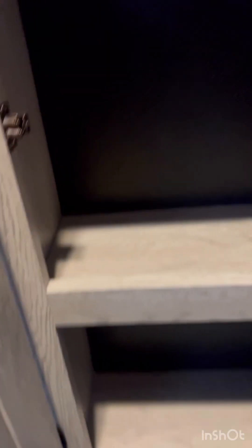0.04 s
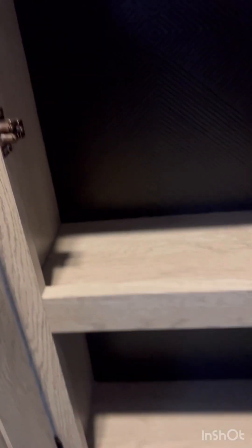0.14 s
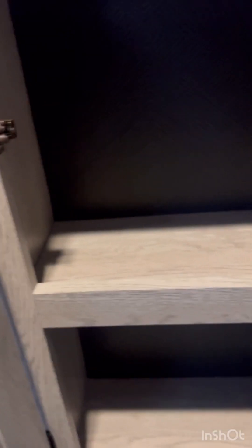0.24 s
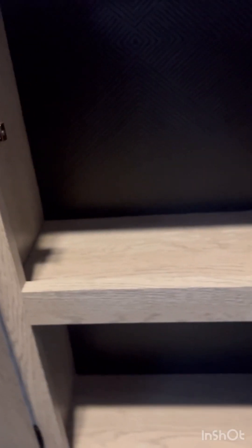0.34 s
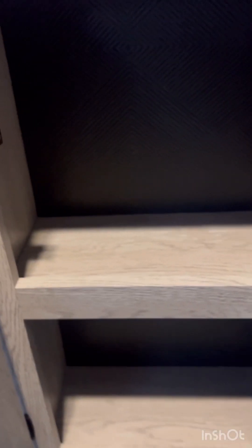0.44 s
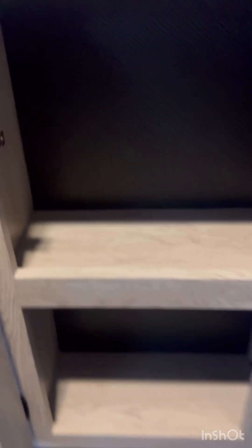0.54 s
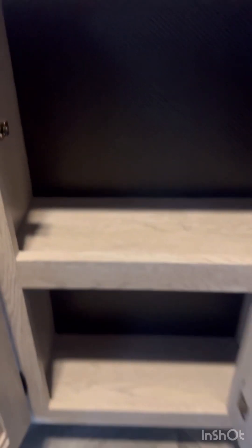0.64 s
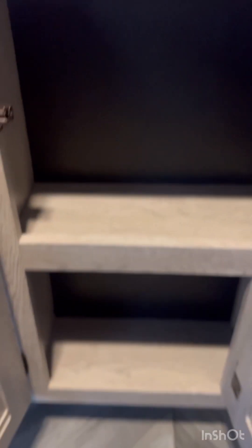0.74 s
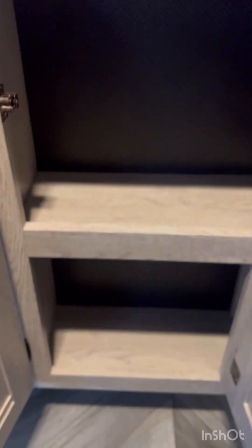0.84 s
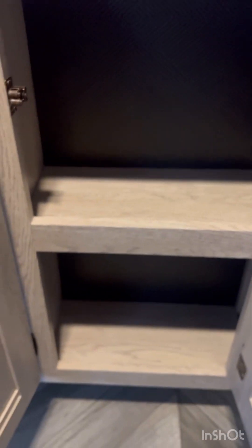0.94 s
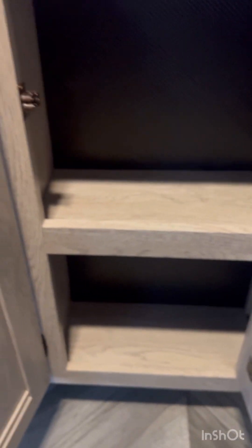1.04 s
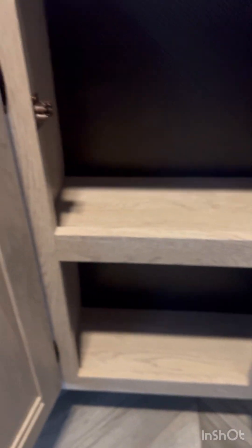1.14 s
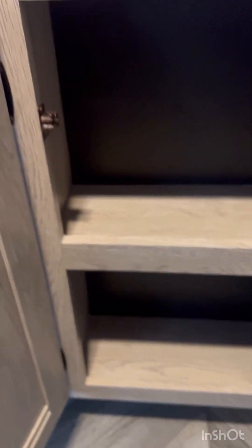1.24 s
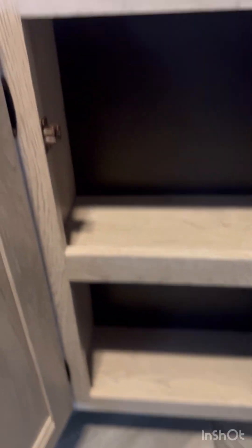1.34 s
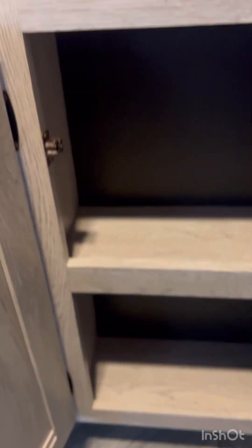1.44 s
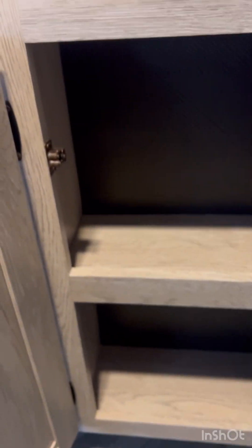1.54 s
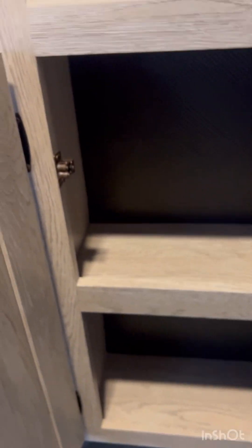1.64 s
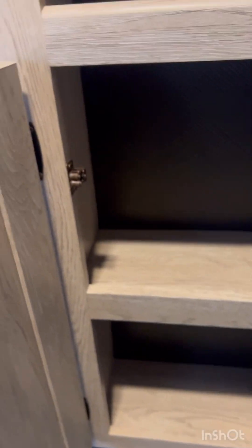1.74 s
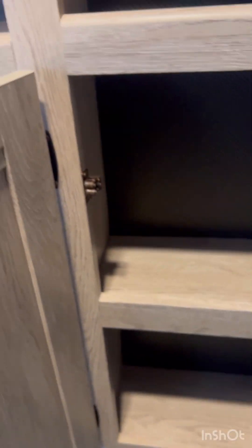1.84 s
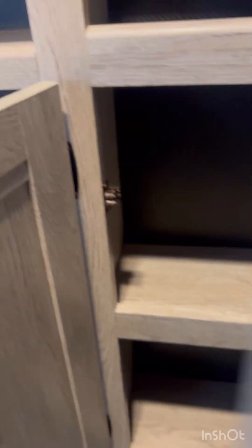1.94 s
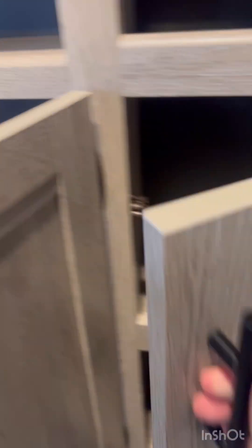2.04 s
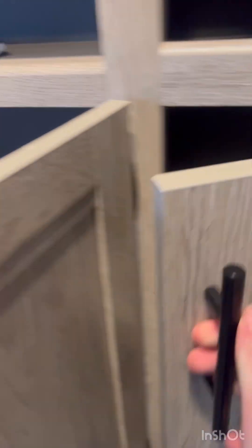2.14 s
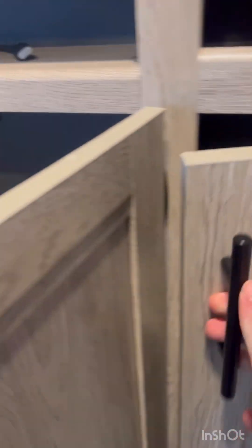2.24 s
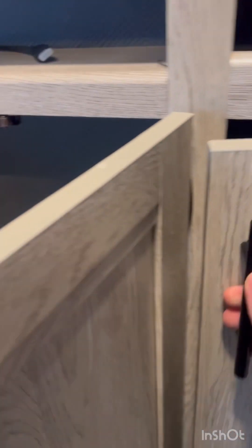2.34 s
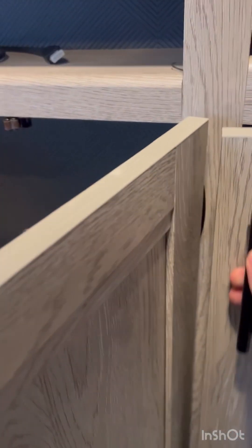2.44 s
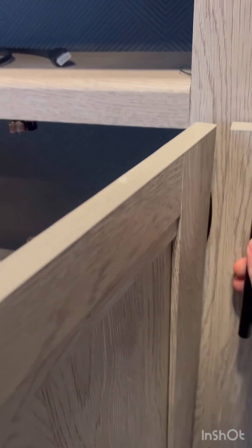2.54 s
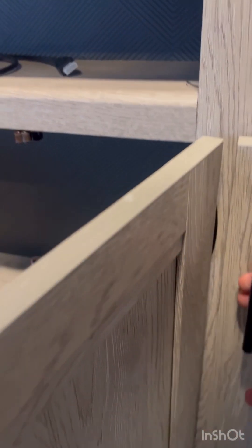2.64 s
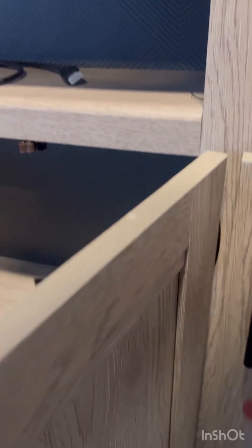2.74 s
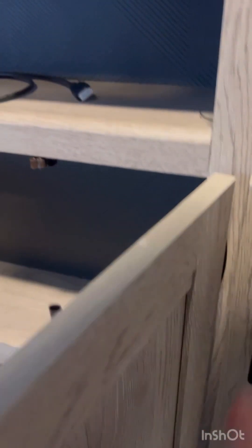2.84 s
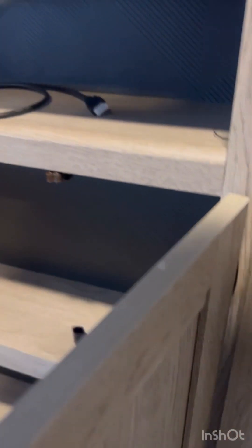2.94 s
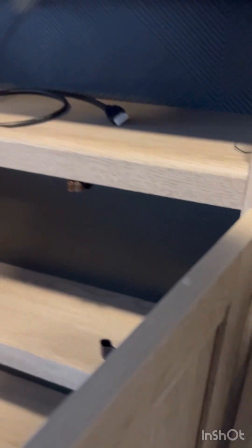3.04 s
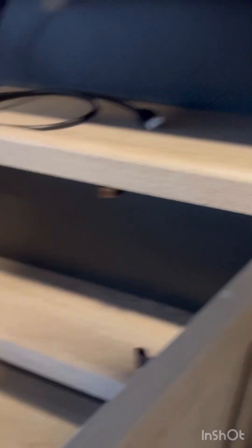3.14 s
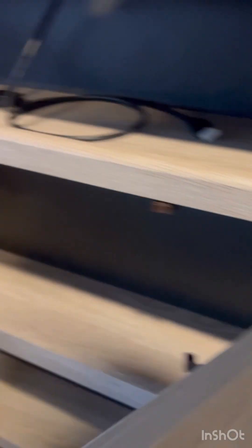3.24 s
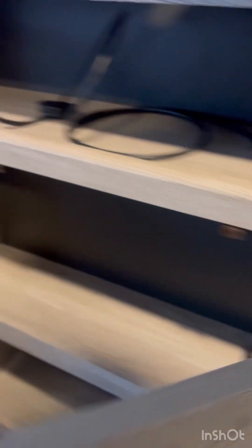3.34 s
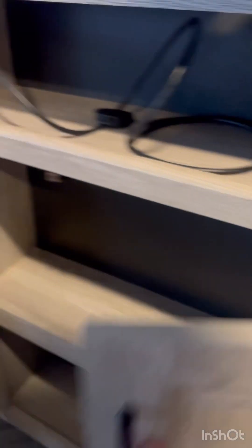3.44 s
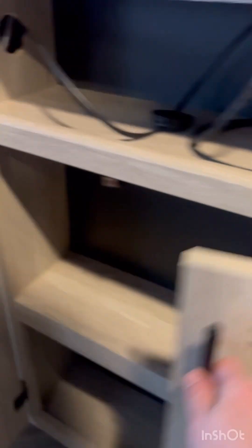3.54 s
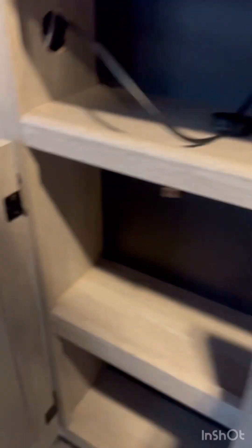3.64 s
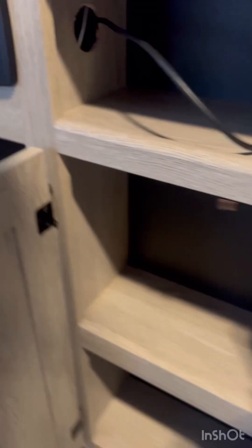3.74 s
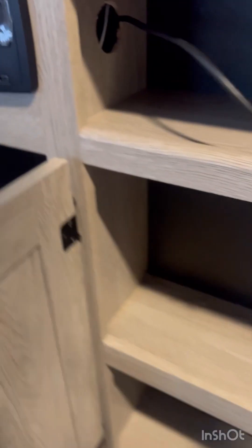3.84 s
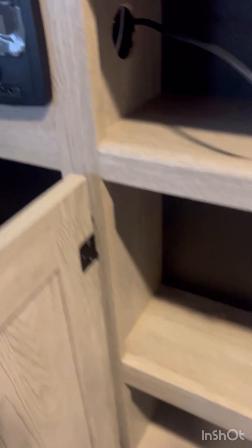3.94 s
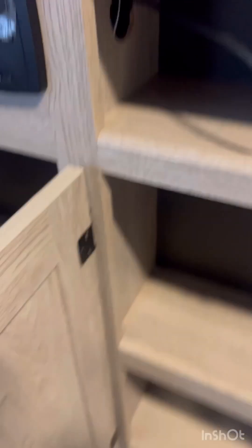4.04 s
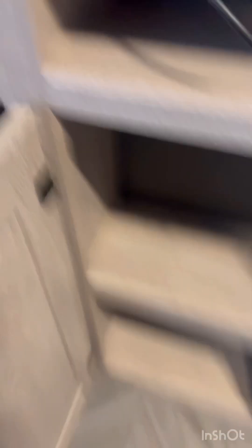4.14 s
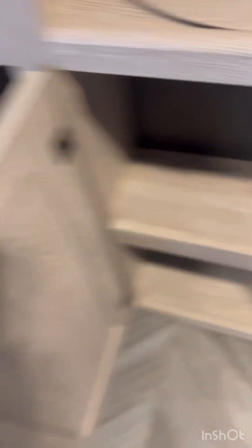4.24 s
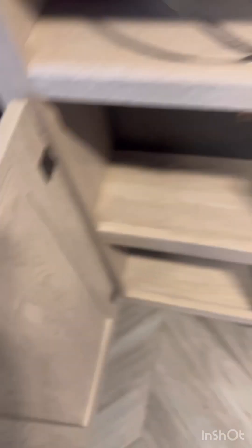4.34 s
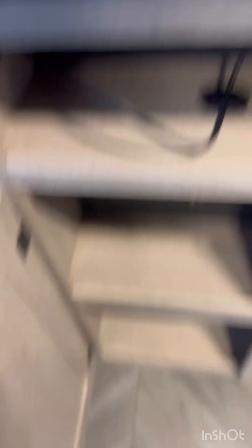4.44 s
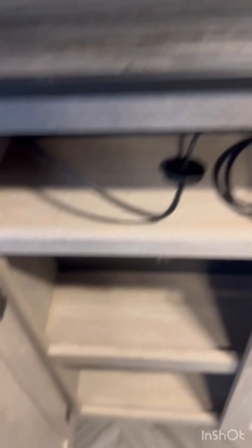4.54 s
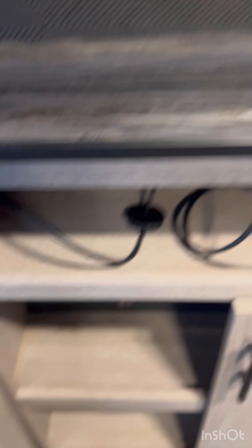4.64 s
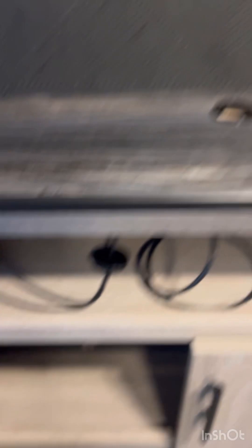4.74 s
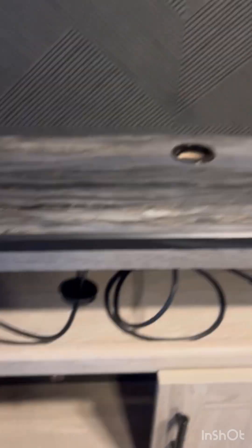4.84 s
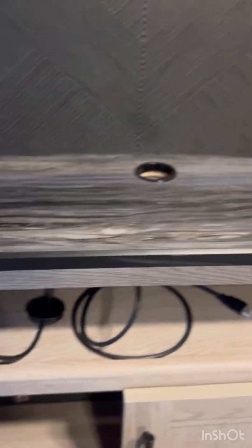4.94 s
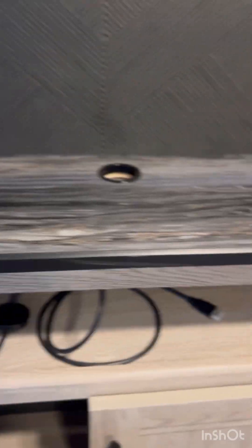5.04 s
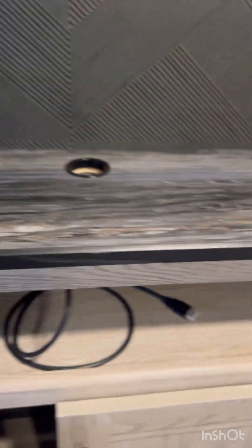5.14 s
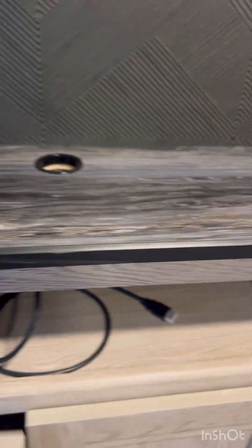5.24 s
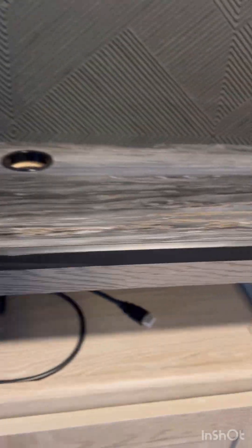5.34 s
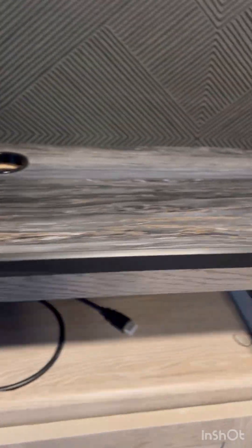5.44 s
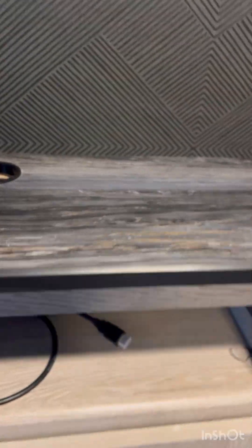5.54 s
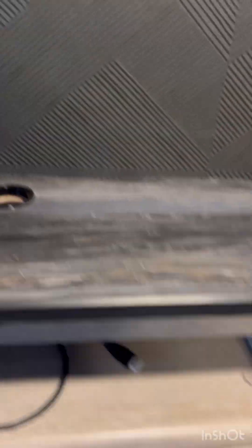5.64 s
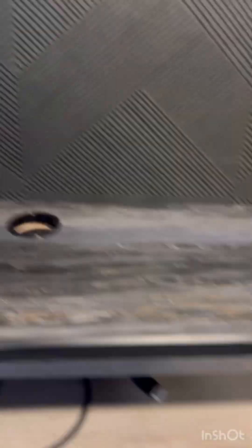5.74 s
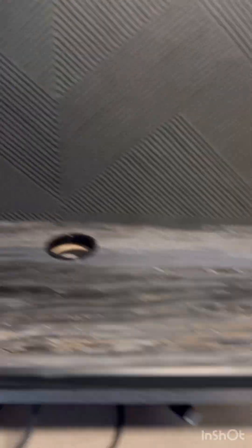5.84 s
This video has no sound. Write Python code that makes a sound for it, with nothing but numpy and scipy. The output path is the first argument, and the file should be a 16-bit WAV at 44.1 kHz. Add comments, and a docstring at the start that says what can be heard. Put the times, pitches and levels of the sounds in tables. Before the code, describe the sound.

Three wooden cabinet doors are pushed shut one after another, each with a bright catch snap, heavy slam and quick bounces in a quiet small camper.

```python
"""Cabinet doors pushed shut in a small camper

Three wooden doors, heard from close by: filtered-noise snaps at the catch, then slams and bounces
made of clicks, noise knocks and decaying panel modes. Between them come dull steps and bumps that hum
in the furniture, dry low-passed taps with short rattles, and cloth rustle of enveloped noise.
Steady coloured noise is the quiet air of the camper.
"""
import sys
import numpy as np
from scipy import signal
from scipy.fft import rfft, irfft, next_fast_len
from scipy.io import wavfile
from scipy.ndimage import uniform_filter1d, minimum_filter1d

SR = 44100
rng = np.random.default_rng(int(sys.argv[2]) if len(sys.argv) > 2 else 0)


def waveform_to_disk(signal):
    """Save audio, clipped to [-1, 1], as 16-bit WAV at the path in sys.argv[1]."""
    frames = np.transpose(np.atleast_2d(signal))
    scaled = np.clip(frames, -1, 1) * 32767
    samples = np.round(scaled).astype(np.int16)
    wavfile.write(sys.argv[1], SR, samples)


N = 260190

# Space and materials
BANDS_HZ = np.geomspace(35, 16000, 22)
RING_SAMPLES = 28000
# wood decay before each source's factor: f/Hz, t60/s
WOOD_DECAY = [(50, 0.36), (150, 0.55), (400, 0.2), (1200, 0.17), (3000, 0.12), (10000, 0.04)]
# room decay: f/Hz, t60/s
ROOM_DECAY = [(50, 1), (150, 0.54), (400, 0.37), (1200, 0.38), (3000, 0.54), (8000, 0.32), (15000, 0.12)]
# stereo width: f/Hz, side over mid/dB
STEREO_WIDTH = [(50, -47), (125, -32), (250, -19.5), (500, -9), (1000, -4), (2000, -11.5), (4000, -5.5),
                (10000, -3.5)]
# nominal early reflections off the door and shelves: delay/s, gain
EARLY_ECHOES = [(0, 0.48), (.0013, -0.26), (.0026, .5), (.0047, -0.12)]

# air of the camper, relative spectrum: f/Hz, density/dB per Hz
AIR_SPECTRUM = [(15, -36), (25, -4.5), (72, 1.5), (166, -10.5), (223, -14.5), (545, -21), (607, -19.5),
                (734, -26), (1130, -28.5), (2110, -27.5), (2610, -33.5), (5280, -44.5), (8590, -49.5),
                (16000, -79)]
AIR_DB = -51.5

# cloth, relative spectrum: f/Hz, density/dB per Hz
CLOTH_SPECTRUM = [(150, 2.5), (400, 6.5), (900, 0), (2000, -3.5), (3500, -2), (6000, -2), (8500, -0.5),
                  (10000, -3), (11500, -22.5), (13000, -23), (15500, -17)]
# body movements that rustle the clothes: t/s, swell/s, length/s, level/dB
BODY_MOVES = [(0, 0.034, 0.069, -61.5), (.33, 0.21, 0.45, -65.5), (1.02, 0.042, 0.3, -66),
              (1.54, 0.11, 0.24, -63.5), (1.85, 0.18, 0.73, -64.5), (2.17, 0.065, .12, -58.5),
              (2.85, 0.17, 0.16, -51), (3.11, 0.02, 0.036, -54), (3.22, .12, 0.16, -47.5),
              (3.44, 0.017, .12, -54.5), (4.04, 0.045, .11, -44.5), (4.2, 0.055, 0.046, -52.5),
              (4.40, 0.086, 0.13, -55), (4.87, 0.16, 0.4, -50.5), (5.65, 0.059, 0.11, -51)]
MOVE_FADE_DB_PER_S = 127
WALK_START_S, WALK_SWELL_S, WALK_DB = 2.3, .15, -59.5  # walking on keeps up a faint rustle
# sleeve on a panel, relative spectrum: f/Hz, density/dB per Hz
BRUSH_SPECTRUM = [(1200, -15), (2400, -7), (3200, -0.5), (4300, -3.5), (5500, -11.5), (9000, -11),
                  (12000, -30)]
BRUSH_S, BRUSH_DB, BRUSH_RISE_DB_PER_S, BRUSH_FADE_DB_PER_S = 5.105, -38.5, 330, 260

# steps and soft bumps on the furniture: t/s, level/dB, centre f/Hz
SOFT_BUMPS = [ (.312, -51.5, 251), (.354, -47.5, 315), (.714, -53.5, 186), (1.072, -55, 400),
              (1.336, -45, 390), (1.420, -43, 313), (1.541, -42, 295), (1.595, -45, 159), (1.735, -53, 202),
              (2.716, -45, 463), (2.744, -36, 80), (2.995, -38.5, 230), (3.008, -36.5, 146),
              (3.157, -38.5, 334), (3.175, -35, 125), (4.508, -37.5, 289), (4.719, -50, 101)]
BUMP_OCTAVES, BUMP_T60_FACTOR = 0.78, 1.0
# light ticks of loose fittings: t/s, level/dB, centre f/Hz
FITTING_TICKS = [(.312, -69.5, 2850), (1.546, -57.5, 1690), (2.826, -59, 1450), (2.886, -57.5, 1087),
                 (3.558, -52, 1760), (3.588, -50.5, 1020), (4.031, -56.5, 1180), (4.5, -51.5, 1710),
                 (4.704, -55.5, 1554)]
TICK_OCTAVES, TICK_T60_FACTOR = 0.22, 0.72
# built-in furniture modes, rung by bumps and ticks: f/Hz, relative level/dB, t60/s
FURNITURE_MODES = [(147.6, 9, 0.34), (167.5, 1.5, 0.13), (213.4, 5.5, 0.42), (290.8, -4, 0.33),
                   (458.4, -2, 0.26), (564, -14, 0.16), (677, -15, 0.14), (1085, 2, 0.11), (1660, 3, 0.21)]
# heavy footfalls on the hollow floor: t/s, level/dB
FLOOR_STEPS = [(4.52, -23), (4.7208, -38)]
# hollow floor modes: f/Hz, relative level/dB, t60/s
FLOOR_MODES = [(80.75, 5, 0.56), (84, -21, 0.21), (119, -8.5, 0.51), (152.6, -10.5, 0.49),
               (224.5, -10.5, 0.4)]

# dry close taps: t/s, relative level/dB, centre f/Hz, width/octaves, direct crack/dB
DRY_TAPS = [(4.108, -31, 1980, 0.12, -4), (4.118, -23, 102.5, 0.19, -10), (4.245, -28, 235, 1.3, -9),
            (4.2559, -30.5, 930, 0.62, 13)]
# chatter runs: t/s, length/s, relative level/dB
RATTLE_RUNS = [(4.109, .056, -37.5), (4.207, .016, -39.5), (4.2612, .019, -33.5)]
RATTLE_GAP_S, RATTLE_JITTER_S, RATTLE_SPREAD_DB = .0072, 0.00065, 1
RATTLE_HZ, RATTLE_OCTAVES, RATTLE_CRACK_DB = 870, 1, -15
TAP_TRIM_DB = -6  # on taps and rattles alike

# A catch snaps twice, as the strike meets its rollers and as it drops in behind them, with a jolt each:
# t/s, door, snap level/dB, spring f/Hz, spring boost/dB, jolt delay/s, jolt level/dB
CATCH_SNAPS = [ (2.486, "first", -30.5, 4100, 7, 0.0041, -18.5),
               (2.537, "first", -37, 8500, 6, 0.000092, -10.5),
               (3.639, "second", -34, 5650, 11, 0.0052, -8), (3.689, "second", -29.5, 7250, 9, 0.00455, -5),
               (5.267, "third", -32.5, 3780, 3.5, 0.00197, -13.5),
               (5.308, "third", -33, 7770, 11.5, 0.000078, -12.5)]
# snap, relative spectrum: f/Hz, density/dB per Hz
SNAP_SPECTRUM = [(200, -20), (800, -7), (2000, 5.5), (3000, 0), (4200, -0.5), (6000, -6), (10000, -3.5),
                 (12500, -27), (15500, -12)]
ROLLER_GAP_S, SECOND_ROLLER_DB, SNAP_CRACK_DB = .004, -4.5, -1  # the two rollers never give way together
JOLT_HZ, JOLT_KNOCK_DB, JOLT_CRACK_DB = 730, -12.5, -1.5  # the sprung catch is a soft contact

# modes of each door with its cabinet: f/Hz, relative level/dB, t60/s
DOOR_MODES = { "first": [(52.05, -5, 1), (63.6, -5, 0.21), (82.9, -18, 0.98), (109, -36, 0.22),
              (151.3, -9, 0.35), (197, -13.5, 0.28), (217, -13, 0.27), (265, -14, 0.23),
              (291.2, -5.5, 0.31), (328, -20, 0.35), (384, -22, 0.25), (501, -11.5, 0.18), (570, -24, 0.25),
              (628, -19, 0.25), (950, -14, 0.14), (1054, -4, 0.078), (1164, -11, 0.11), (1550, -38, .18),
              (2020, -22, .16), (2127, -18.5, 0.17), (2850, -48, .22)], "second": [(51, -23, .7),
              (65.25, -28.5, 1), (99.4, -26, 0.57), (152.3, -14.5, 0.44), (182, -10, 0.16),
              (196, -20, 0.35), (212.4, -11.5, 0.31), (260, -12, 0.13), (309, -16, 0.32),
              (338.6, -0.5, 0.064), (465, -17, 0.22), (548, -8, 0.13), (588, -5, 0.11), (640, -40, .2),
              (726, -16, 0.26), (973, -26, 0.16), (1127, -12, 0.17), (1260, -23, 0.25), (1670, -18, .2),
              (1656, -25, 0.15), (1800, -13.5, 0.15), (2208, -10, 0.14), (2282, -28, 0.17), (2550, -40, .2),
              (2868, -17, 0.079), (3920, -13, 0.14)], "third": [(49.2, -22, 0.81), (75, -27, 0.44),
              (92.2, -11.5, 0.36), (131.3, -7.5, 0.3), (143.1, -12, 0.45), (155.5, -10, 0.37),
              (186, -12.5, 0.25), (225, -16, 0.27), (259.4, -7, 0.19), (312, -16.5, 0.25),
              (364.5, -20, 0.39), (458, -28.5, 0.52), (599, -27, 0.22), (762, -36, 0.47),
              (1141, -17.5, 0.29), (1320, -42, 0.21), (1610, -32.5, 0.47), (1820, -39, 0.43),
              (2050, -23, 0.29)]}
# knock, relative spectrum: f/Hz, density/dB per Hz
KNOCK_SPECTRUM = [(35, 8), (60, 4.5), (120, 3.5), (280, 7), (550, -3), (800, -2.5), (1100, -5),
                  (1500, -3.5), (2200, -4), (4000, -8.5), (9000, -2.5), (16000, -15)]
# door lands on its frame: t/s, door, panel ring level/dB, knock level/dB, hardness f/Hz,
# direct crack/dB, first bounce delay/s, change per bounce/dB
FRAME_SLAMS = [ (2.545, "first", -5.5, -20.5, 1950, 5, 0.045, -9.5),
               (3.7051, "second", -6.5, -17.5, 3020, -3, 0.032, -10),
               (5.3184, "third", -4, -18.5, 1590, -16, .0585, -5)]
# each bounce comes sooner and is duller than the last
BOUNCES, BOUNCE_SHRINK, BOUNCE_SOFTEN, BOUNCE_CRACK_DB = 3, .55, 0.71, -6.5

LOW_CUT_HZ, EDGE_HZ = 30, 16200  # microphone high-pass, final low-pass


def amp(db):
    """Decibels to gain."""
    return 10 ** (np.asarray(db) / 20)


def evened(x):
    """Scales to rms 1."""
    return x / np.sqrt(np.mean(x ** 2) + 1e-20)


def read(points, hz):
    """Interpolates a table on a log-frequency axis."""
    f, value = np.transpose(points)
    return np.interp(np.log(hz + 1), np.log(f + 1), value)


def add(mix, s, sound):
    """Mixes a sound in at time s."""
    part = mix[:, round(s * SR):][:, :sound.shape[-1]]
    part += sound[..., :part.shape[1]]


def hump(hz, centre_hz, octaves):
    """Bell with wide skirts on the octave axis, top 1."""
    return 1 / (1 + (np.log2((hz + 1) / centre_hz) / octaves) ** 2 / 4) ** 2


def wavy(count, size):
    """Smooth random curve, rms 1, that changes over about size points."""
    smooth = uniform_filter1d(rng.standard_normal(count), size)
    return evened(uniform_filter1d(smooth, size))


def stereo_noise(size, apart=0.93):
    """White-noise spectrum at two microphones: standing waves shift its phase between them."""
    mid, own = rfft(rng.standard_normal((2, size)))
    width = amp(read(STEREO_WIDTH, np.fft.rfftfreq(size, 1 / SR)))
    phase = np.arctan(width) * np.tanh(2 * wavy(len(mid), size=size // 150))
    turn = np.exp(1j * phase)
    side = apart * width * own
    return np.array([mid * turn + side, mid / turn - side])


def steady(spectrum):
    """Stereo noise of a given colour, rms 1."""
    size = next_fast_len(N, True)
    colour = amp(read(spectrum, np.fft.rfftfreq(size, 1 / SR)))
    return evened(irfft(stereo_noise(size) * colour, size)[:, :N])


def band_noise(size=65536, ripple_db=3.5):
    """Noise with the uneven peaks of many panel and room modes, split into narrow bands."""
    hz, z = np.fft.rfftfreq(size, 1 / SR), stereo_noise(size)
    # higher up the modes merge
    z = z * amp(ripple_db * wavy(len(hz), size=70) * hump(hz, centre_hz=970, octaves=2.0))
    bands = []
    for row in np.eye(len(BANDS_HZ)):
        mask = np.interp(np.log(hz + 1), np.log(BANDS_HZ), row) * (hz > 25)
        bands.append(irfft(z * np.sqrt(mask)))
    return np.array(bands, np.float32)


def pulse(colour, size=4096):
    """Minimum-phase click: the sharpest causal one with this spectrum, energy 1."""
    gain = colour(np.fft.rfftfreq(size, 1 / SR))
    log_gain = np.log(gain / gain.max() + 1e-5)
    circle = np.r_[log_gain, log_gain[-2:0:-1]]
    click = np.fft.ifft(np.exp(np.conj(signal.hilbert(circle)))).real
    return click / np.linalg.norm(click)


def dying(t60_factor, room_db, rise_cycles):
    """Band envelopes: each builds over its first cycles, dies with the wood and lingers in the room."""
    t, hz = np.arange(RING_SAMPLES, dtype=np.float32) / SR, BANDS_HZ[:, None]
    # energies, hence ln(1e6) for 60 dB
    wood = np.exp(-np.float32(np.log(1e6) / (t60_factor * read(WOOD_DECAY, hz))) * t)
    room = np.exp(-np.float32(np.log(1e6) / read(ROOM_DECAY, hz)) * t)
    rise = 1 - np.exp(-np.float32(hz / rise_cycles) * t)
    return np.sqrt(wood + room * float(amp(2 * room_db))) * rise


def hit(noise, colour, envelope, crack_db, thin_hz=30):
    """Direct click, thin in the bass, its first echoes and a diffuse ring with the energy of 30 ms at level 1."""
    start = rng.integers(noise.shape[-1] - RING_SAMPLES)
    bands = noise[..., start:start + RING_SAMPLES] * envelope[:, None]
    share = colour(BANDS_HZ) * np.sqrt(BANDS_HZ)  # bandwidth grows with frequency
    band_rms = np.sqrt(np.einsum("bct,bct->b", bands, bands) / 2)
    weight = share / np.linalg.norm(share) / band_rms
    sound = np.einsum("b,bct->ct", np.float32(weight), bands)
    click = amp(crack_db) * pulse(lambda hz: colour(hz) * hz ** 2 / np.hypot(hz ** 2, thin_hz ** 2))
    paths = rng.uniform(.85, 1.15, len(EARLY_ECHOES))
    for (delay_s, gain), path in zip(EARLY_ECHOES, paths):
        add(sound, delay_s * path, gain * click)
    return sound * np.sqrt(.03 * SR)


def ring_modes(modes, rise_cycles, hard_hz):
    """Panel modes swell over their first cycles and die; a soft contact leaves the high ones still."""
    t, out = np.arange(SR, dtype=np.float32) / SR, np.zeros((2, SR))
    for k, (hz, db, t60_s) in enumerate(modes):
        sign = (-1) ** k  # neighbours swing opposite ways
        lead = np.float32(sign * amp(read(STEREO_WIDTH, hz)) * np.array([[1], [-1]]))
        envelope = np.exp(-float(np.log(1000) / t60_s) * t) * (1 - np.exp(-t * hz / rise_cycles))
        gain = sign * float(amp(db) / np.hypot(1, (hz / hard_hz) ** 2))
        out += gain * envelope * np.sin(2 * np.pi * hz * t + lead)
    return out


def air():
    """Quiet air of the camper: steady coloured noise."""
    return amp(AIR_DB) * steady(AIR_SPECTRUM)


def movement(start_s, swell_s, length_s):
    """Envelope of one movement: it swells, holds and fades."""
    t = np.arange(N) / SR - start_s
    return np.clip(t / swell_s, 0, 1) * amp(-MOVE_FADE_DB_PER_S * np.maximum(t - length_s, 0))


def rustle(flutter_db=1.0):
    """Cloth slides in small uneven slips with every movement; a sleeve once brushes along a panel."""
    moves = BODY_MOVES + [(WALK_START_S, WALK_SWELL_S, N / SR, WALK_DB)]
    cloth = np.sqrt(sum((amp(db) * movement(*timing)) ** 2 for *timing, db in moves))
    t = np.arange(N) / SR - BRUSH_S
    brush = amp(BRUSH_DB + np.minimum(BRUSH_RISE_DB_PER_S * t, -BRUSH_FADE_DB_PER_S * t))
    slides = cloth * steady(CLOTH_SPECTRUM) + brush * steady(BRUSH_SPECTRUM)
    return slides * amp(flutter_db * wavy(N, size=400))


def bumps(noise, furniture_db=-1):
    """Dull knocks and light ticks farther off hum in the furniture; the floor booms under a heel."""
    out = np.zeros((2, N))
    for events, octaves, t60_factor in ((SOFT_BUMPS, BUMP_OCTAVES, BUMP_T60_FACTOR),
                                        (FITTING_TICKS, TICK_OCTAVES, TICK_T60_FACTOR)):
        envelope = dying(t60_factor, room_db=-8, rise_cycles=0.25)
        for s, db, centre_hz in events:
            colour = lambda hz: hump(hz, centre_hz, octaves) / np.sqrt(hz + 1)
            add(out, s, amp(db) * hit(noise, colour, envelope, crack_db=-21.5))
            # modes near the bump's own pitch ring most
            excited = [(hz, mode_db + 20 * np.log10(hump(hz, centre_hz, octaves)), t60_s)
                       for hz, mode_db, t60_s in FURNITURE_MODES]
            add(out, s, amp(db + furniture_db) * ring_modes(excited, rise_cycles=0.85, hard_hz=4000))
    boom = ring_modes(FLOOR_MODES, rise_cycles=0.47, hard_hz=910)
    for s, db in FLOOR_STEPS:
        add(out, s, amp(db) * boom)
    return out


def chatter(count=16):
    """Each rattle is a run of small, slightly uneven taps, at most count of them."""
    for start_s, length_s, db in RATTLE_RUNS:
        for k, (late, strong) in enumerate(rng.standard_normal((count, 2))):
            if k * RATTLE_GAP_S < length_s:
                yield (start_s + k * RATTLE_GAP_S + RATTLE_JITTER_S * late, db + RATTLE_SPREAD_DB * strong,
                       RATTLE_HZ, RATTLE_OCTAVES, RATTLE_CRACK_DB)


def taps(noise, t60_s=0.042, room_db=-27, room_t60_s=0.45, top_hz=2080, leak_db=-18):
    """Dull taps and rattles, too near for the room to matter; little passes above top_hz."""
    out, t = np.zeros((2, N)), np.arange(RING_SAMPLES) / SR
    decay = np.hypot(amp(-60 * t / t60_s), amp(room_db - 60 * t / room_t60_s))
    envelope = np.float32(decay * (1 - np.exp(-3 * t * BANDS_HZ[:, None])))
    for s, db, centre_hz, octaves, crack_db in DRY_TAPS + list(chatter()):
        colour = lambda hz: hump(hz, centre_hz, octaves) / np.sqrt(hz + 1)
        tap = hit(noise, colour, envelope, crack_db, thin_hz=0.29 * centre_hz)
        add(out, s, amp(db + TAP_TRIM_DB) * tap)
    low_pass = signal.butter(N=10, Wn=top_hz, fs=SR, output="sos")
    return signal.sosfilt(low_pass, out + 1e-18) + amp(leak_db) * out


def catches(noise):
    """The strike hits the sprung rollers and drops in behind them: bright snaps, one from each roller."""
    out, envelope = np.zeros((2, N)), dying(t60_factor=0.78, room_db=-9.5, rise_cycles=2.2)
    for s, _, db, spring_hz, spring_db, *_ in CATCH_SNAPS:
        colour = lambda hz: amp(read(SNAP_SPECTRUM, hz) + spring_db * hump(hz, spring_hz, octaves=0.19))
        for delay_s, roller_db in (0, 0), (ROLLER_GAP_S, SECOND_ROLLER_DB):
            add(out, s + delay_s, amp(db + roller_db) * hit(noise, colour, envelope, SNAP_CRACK_DB))
    return out


def doors(noise):
    """The catch jolts the door, then it slams on the frame and bounces three times, ever weaker."""
    out, envelope = np.zeros((2, N)), dying(t60_factor=0.95, room_db=-10.5, rise_cycles=1.95)

    def blow(s, door, panel_db, knock_db, hard_hz, crack_db):
        """Each blow rings its door; a harder contact reaches higher up."""
        colour = lambda hz: amp(read(KNOCK_SPECTRUM, hz)) / np.sqrt(1 + (hz / hard_hz) ** 5.5)
        add(out, s, amp(knock_db) * hit(noise, colour, envelope, crack_db, thin_hz=0.29 * hard_hz))
        add(out, s, amp(panel_db) * ring_modes(DOOR_MODES[door], rise_cycles=1.0, hard_hz=0.7 * hard_hz))

    for s, door, *_, delay_s, db in CATCH_SNAPS:
        blow(s + delay_s, door, db, db + JOLT_KNOCK_DB, JOLT_HZ, JOLT_CRACK_DB)
    for s, door, panel_db, knock_db, hard_hz, crack_db, gap_s, change_db in FRAME_SLAMS:
        blow(s, door, panel_db, knock_db, hard_hz, crack_db)
        for k in range(1, BOUNCES + 1):
            s += gap_s * BOUNCE_SHRINK ** (k - 1)
            blow(s, door, panel_db + k * change_db, knock_db + k * change_db,
                 hard_hz * BOUNCE_SOFTEN ** k, BOUNCE_CRACK_DB)
    return out * amp([[-.3], [.3]])  # slightly to the right


def scene():
    """Doors, catches and small noises over the quiet air of the camper."""
    noise = band_noise()
    return air() + rustle() + bumps(noise) + taps(noise) + catches(noise) + doors(noise)


def record(dry):
    """Microphone drops the deepest bass, a fast limiter holds peaks under full scale; then the band limit."""
    low_cut = signal.butter(N=3, Wn=LOW_CUT_HZ, btype="high", fs=SR, output="sos")
    dry = signal.sosfilt(low_cut, dry)
    allowed = np.minimum(1, .95 / (abs(dry).max(0) + 1e-9))
    gain = uniform_filter1d(minimum_filter1d(allowed, size=133), size=133)
    band_limit = signal.firwin(511, EDGE_HZ, window=("kaiser", 9), fs=SR)
    return signal.oaconvolve(dry * gain, band_limit[None], "same")


dry = scene()
out = record(dry)
waveform_to_disk(out)
```